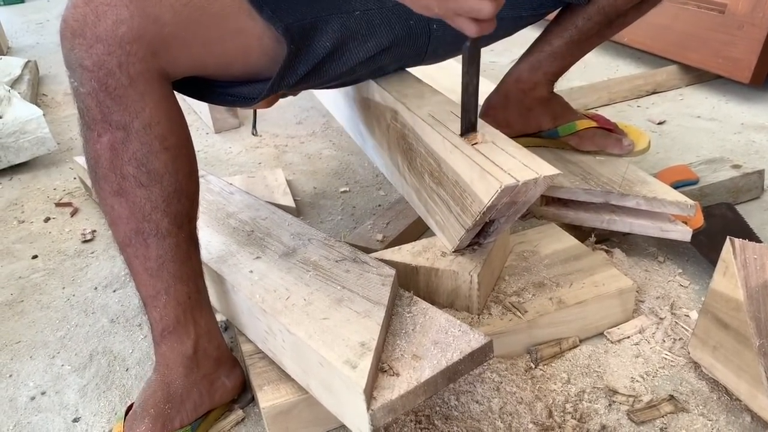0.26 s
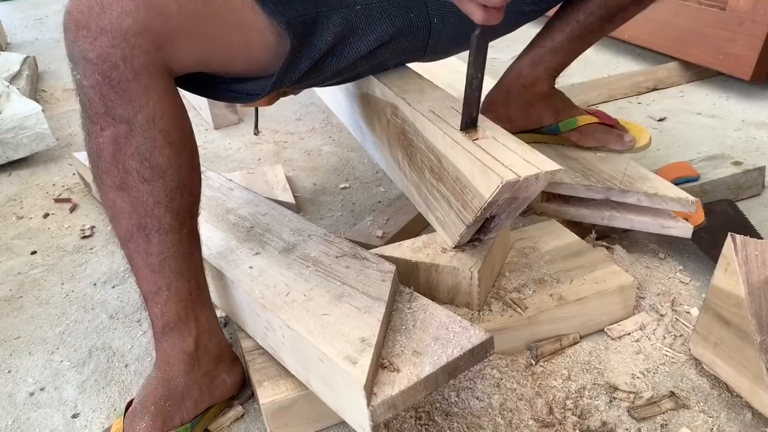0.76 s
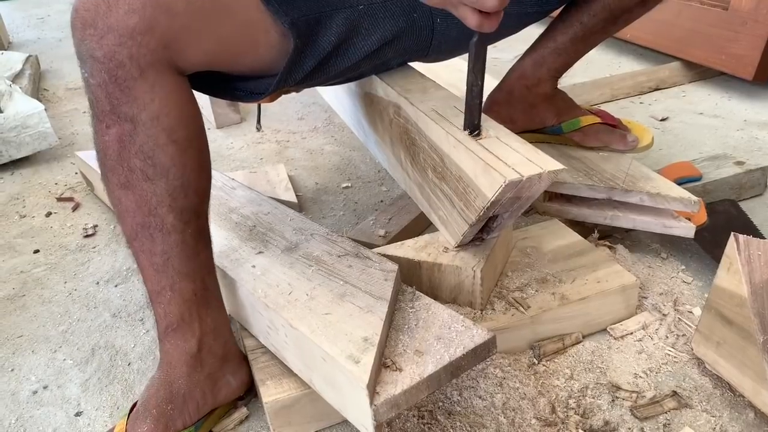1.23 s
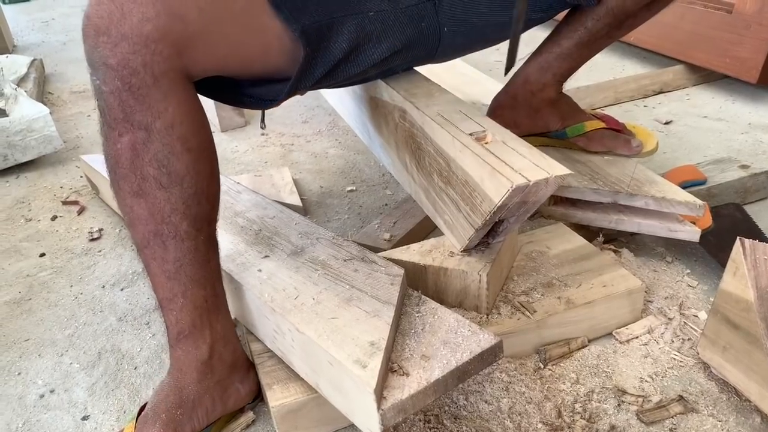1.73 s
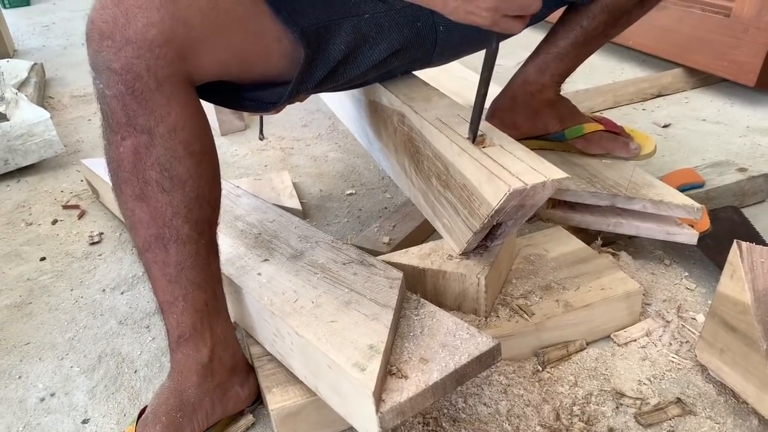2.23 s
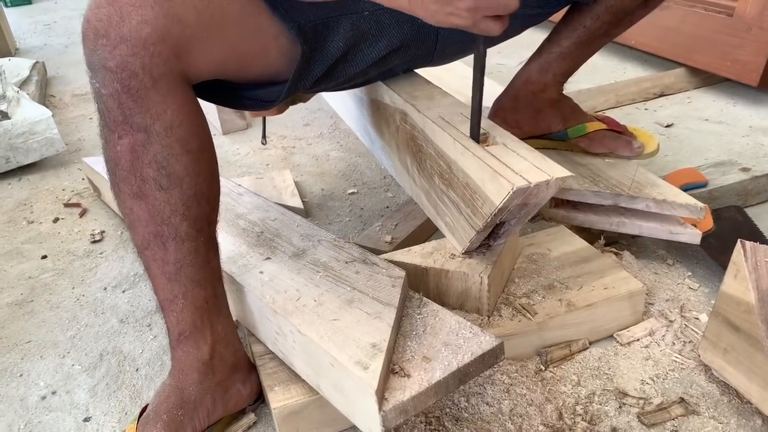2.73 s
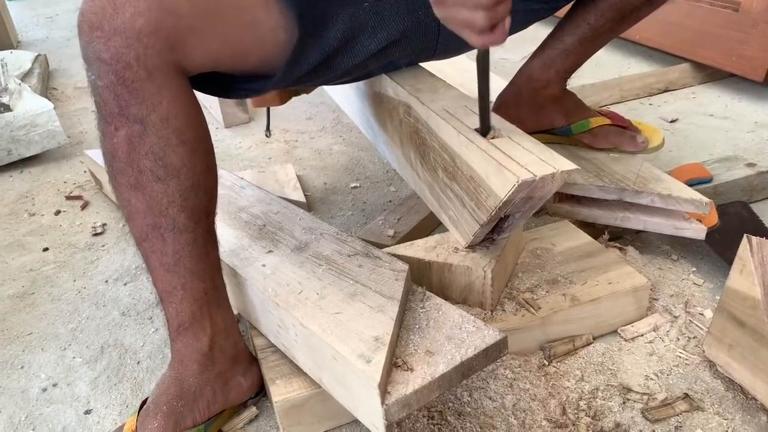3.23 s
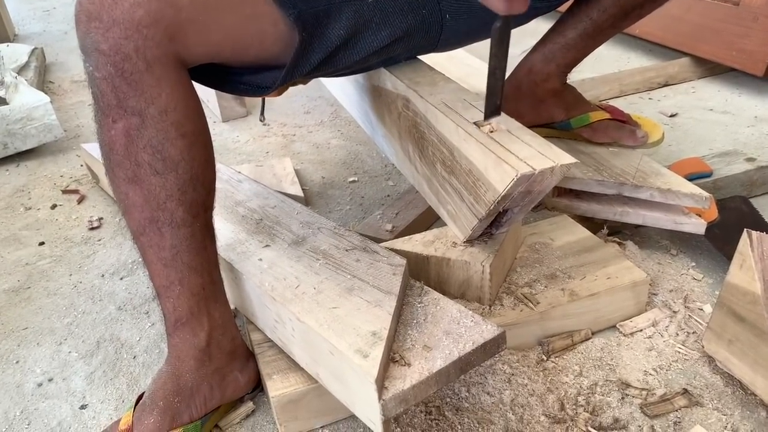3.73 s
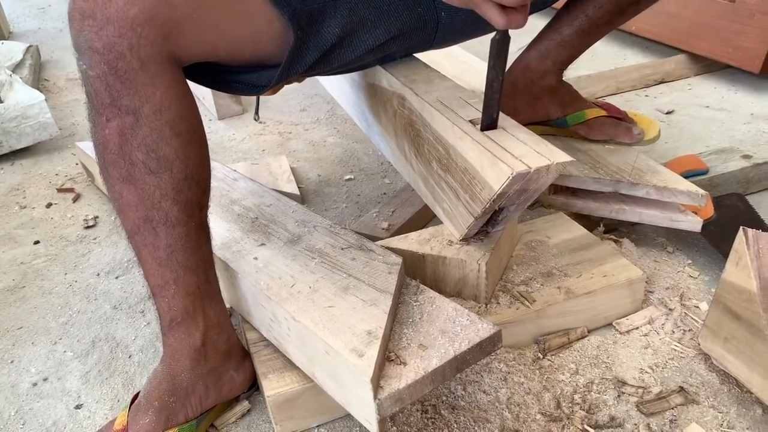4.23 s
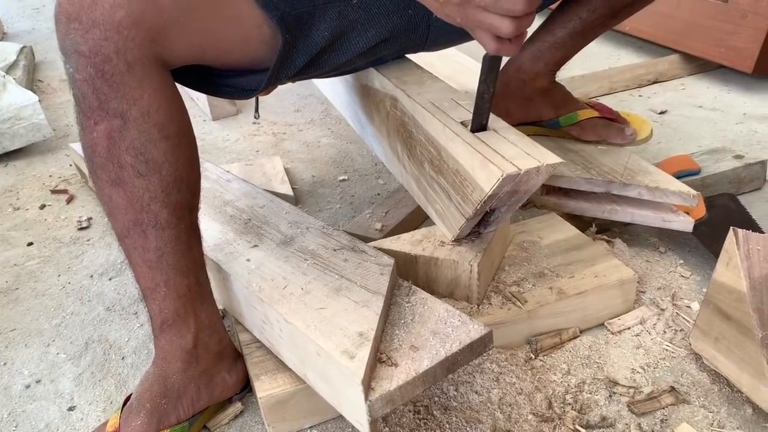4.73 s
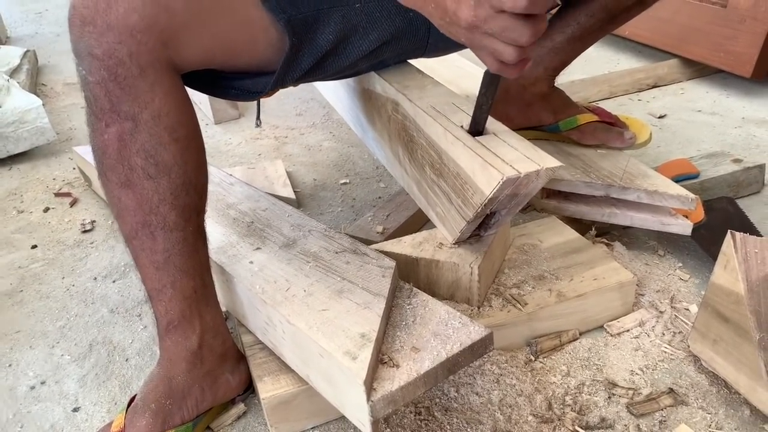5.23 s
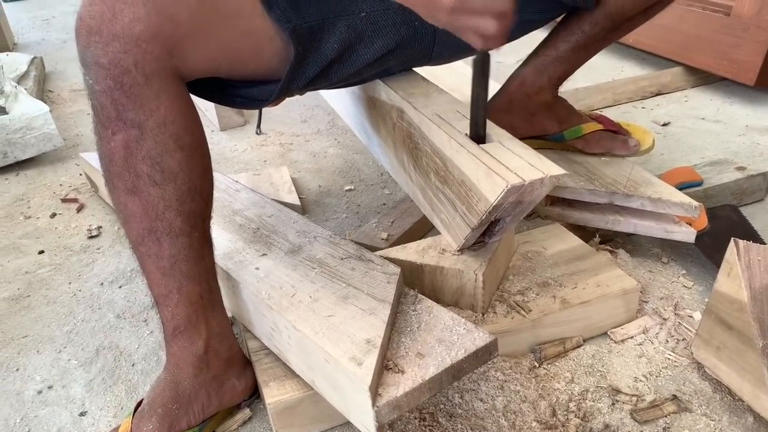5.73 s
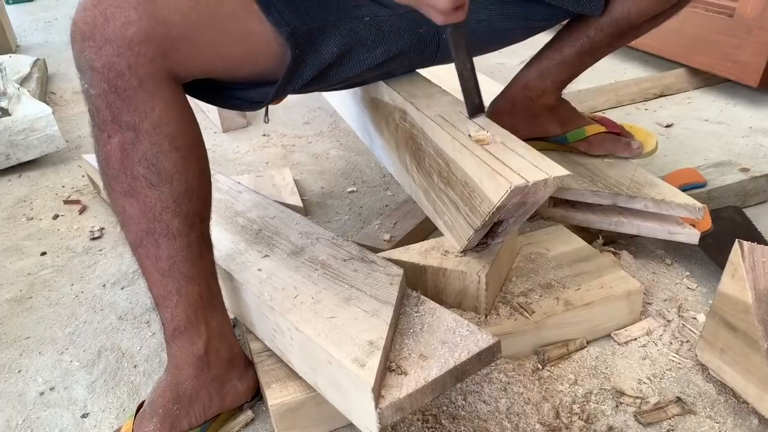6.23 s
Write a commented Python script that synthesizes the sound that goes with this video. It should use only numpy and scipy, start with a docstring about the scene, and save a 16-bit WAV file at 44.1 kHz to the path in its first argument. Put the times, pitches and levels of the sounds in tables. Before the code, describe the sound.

Close to the microphone, a hammer strikes a chisel set in a timber beam: two strong blows, a pause, a weak tap and a firmer blow, another pause, then four quick hard ones. Each cracks with brief steel ring, hollow wooden knock and about a second of bare-room echo. Small ticks and wood bumps fall between. Farther off, gritty scrapes like a stiff broom on concrete come and go over low outdoor rumble.

```python
"""Chisel and hammer in a bare concrete room

A carpenter close to the microphone drives a chisel into a timber beam with a hammer, in short runs.
Each blow is a crack of noise with ringing steel, then the decaying modes and hops of the beam on its
blocks, then the room's dense echoes. Farther off come gritty strokes like a stiff broom on concrete:
tufts of rough noise, sand and ticking chips. A low outdoor rumble lies under both."""
import sys
import numpy as np
from scipy import signal
from scipy.fft import rfft, irfft, next_fast_len
from scipy.io import wavfile
from scipy.ndimage import uniform_filter1d

SR = 44100
rng = np.random.default_rng(int(sys.argv[2]) if len(sys.argv) > 2 else 0)


def wav_out(sig):
    """Save sig, one row per channel (or a flat mono array), as 16-bit PCM at SR to the path in sys.argv[1]."""
    wavfile.write(sys.argv[1], SR, np.round(np.clip(np.atleast_2d(sig).T, -1, 1) * 32767).astype(np.int16))


N = 285327
TIME = np.arange(N) / SR
RING_TIME = TIME[:int(1.3 * SR)]   # the span of one struck sound or echo [s]

# modes of the beam on its blocks: (frequency [Hz], relative level [dB], t60 [s])
BEAM_MODES = [(64.5, -25.5, 0.39), (163.9, -14, 0.19), (183.1, -18.5, 0.22), (281.4, -20.5, 0.29),
              (439.4, -10.5, 0.15), (451.6, -29, 0.57), (534, -24.5, 0.5), (573, -15.5, 0.094),
              (635.1, -10.5, 0.24), (720, -19.5, 0.17), (905, -15.5, 0.083), (1064, -19.5, 0.084),
              (1460, -31.5, 0.29), (1720, -33, 0.11), (2140, -29.5, 0.14), (2690, -32, 0.11)]
# how long the room rings: (frequency [Hz], t60 [s])
ROOM_T60 = [(60, 0.8), (250, 1.195), (600, 0.99), (2000, 0.84), (5000, 0.84), (9000, 0.52), (15000, 0.36)]
# likeness of the two channels: (frequency [Hz], correlation [1 = alike, nominal])
LIKENESS = [(60, 1), (130, 0.92), (290, 0.9), (640, 0.33), (1400, 0.053), (3000, -0.094), (6500, 0.12),
            (7300, -0.42), (8200, 0.42), (10200, 0.085), (10700, -1), (11900, -1.4), (12500, 0.78),
            (15000, 0.3)]


def from_db(db):
    """Decibels to gain."""
    return 10 ** (np.asarray(db) / 20)


def at_hz(points, hz):
    """Read a table on a log-frequency axis."""
    known_hz, values = np.transpose(points)
    return np.interp(np.log(np.maximum(hz, 1)), np.log(known_hz), values)


def add(track, s, sound):
    """Mix a sound into a track at time s."""
    start = max(round(s * SR), 0)
    part = sound[:, :N - start]
    track[:, start:start + part.shape[1]] += part


def noise(spectrum, size, direct=0, colour=((1, 0),)):
    """Stereo noise of rms 1, then coloured by (Hz, dB) points; the direct share is the same at both ears."""
    padded = next_fast_len(size)
    hz = np.arange(padded // 2 + 1) * SR / padded
    alike = np.clip(direct + (1 - direct) * at_hz(LIKENESS, hz), -1, 1)
    shape = from_db(at_hz(spectrum, hz))
    white = rfft(rng.standard_normal((2, padded)))
    mid, side = white * from_db(at_hz(colour, hz)) * shape / np.sqrt(np.mean(shape ** 2))
    shared = np.sqrt((1 + alike) / 2) * mid
    opposed = np.sqrt((1 - alike) / 2) * side * [[1], [-1]]
    return irfft(shared + opposed, padded)[:, :size]


def coloured(sound, colour):
    """Shape a sound by (Hz, dB) points."""
    size = sound.shape[1]
    hz = np.arange(size // 2 + 1) * SR / size
    return irfft(rfft(sound) * from_db(at_hz(colour, hz)), size)


def bell(sound, hz, width_hz, db):
    """A peak or dip in the frequency response."""
    w, height = 2 * np.pi * hz / SR, from_db(db / 2)
    alpha = np.tan(np.pi * width_hz / SR)
    zeros = [1 + alpha * height, -2 * np.cos(w), 1 - alpha * height]
    poles = [1 + alpha / height, -2 * np.cos(w), 1 - alpha / height]
    return signal.lfilter(zeros, poles, sound)


def catching(depth_db, length, size):
    """Uneven friction: a gain that wanders over about size samples."""
    wander = uniform_filter1d(rng.standard_normal(length), size)
    return from_db(depth_db * wander / np.std(wander))


def dying(t60, rise_s):
    """Envelope of a struck thing: a quick rise, then exponential decay."""
    return (1 - np.exp(-RING_TIME / rise_s)) * from_db(-60 * np.minimum(RING_TIME / t60, 4))


def ring(modes, gains_db, rise_s, scatter_db, detune):
    """Decaying modes start from rest; contacts vary their strength and pitch, and channels their phase."""
    out = np.zeros((2, len(RING_TIME)))
    scatter = rng.standard_normal((len(modes), 3))
    for k, ((hz, db, t60), gain_db, (strength, pitch, ears)) in enumerate(zip(modes, gains_db, scatter)):
        # the less alike the channels are at this pitch, the further out of step
        apart = np.sign(ears) * np.arccos(np.clip(at_hz(LIKENESS, hz), -1, 1)) / 3
        angle = 2 * np.pi * hz * (1 + detune * pitch) * RING_TIME + apart * np.array([[1], [-1]])
        gain = (-1) ** k * from_db(db + gain_db + scatter_db * strength)
        out += gain * dying(t60, rise_s) * np.sin(angle.astype(np.float32))
    return out


def ambience():
    """A steady low outdoor rumble: shaped noise."""
    # (frequency [Hz], relative density [dB per Hz])
    rumble = [(20, -30), (35, 0.5), (55, 5.5), (100, -4), (200, -6), (500, -11.5), (1000, -19),
              (2500, -26.5), (6000, -29.5), (9000, -24), (15000, -44.5)]
    return from_db(-46.5) * noise(rumble, N)


def sagging(sound, middle_s):
    """The bristles bend further as a stroke goes on, so their pitch falls, passing its own at middle_s."""
    octaves_per_s = 1.2
    t = TIME[:sound.shape[1]]
    read_s = np.cumsum(2 ** (octaves_per_s * (middle_s - t))) / SR
    return np.array([np.interp(read_s, t, channel) for channel in sound])


def chips(size, count=12):
    """Loose chips flicked over the floor tick at random, most faintly, in a dozen damped resonances."""
    chips_per_s, t60_s = 88, 0.022
    out = np.zeros((2, size))
    for hz in np.geomspace(900, 5000, count) * rng.uniform(.93, 1.07, count):
        hit = rng.random(size) < chips_per_s / count / SR
        clicks = hit * from_db(3.5 * np.minimum(rng.exponential(1, size), 3) - 10)
        r, w = from_db(-60 / (t60_s * SR)), 2 * np.pi * hz / SR
        # the tiny offset keeps the filter out of slow denormal numbers
        ticks = signal.lfilter([0, np.sin(w)], [1, -2 * r * np.cos(w), r * r], clicks + 1e-18)
        out += ticks * rng.uniform(.4, 1, (2, 1))   # left and right gains
    return out


def broom(edge_s=0.02, tuft_spread=0.49, tuft_width=0.11, tuft_db=7, count=4):
    """Bristle tufts catch on concrete, each at its pitch; the head resonates and squeaks, dragging grit."""
    # broom strokes: (start [s], length [s], rise [s], effort [relative dB], sand [relative dB],
    # body [Hz], body peak [dB], squeak [Hz], squeak peak [dB])
    strokes = [(0.0, 0.026, 0.0013, -26.5, -43, 1370, 10.5, 1470, 0),
               (0.037, 0.15, .07, -18.5, -29, 1720, 2.5, 3990, 8),
               (0.563, 0.061, 0.016, -24, -33.5, 1350, 7.5, 876, 15.5),
               (0.6, 0.3, 0.047, -17.5, -26, 1480, 7, 1980, 2.5),
               (0.921, 0.2, 0.039, -18.5, -31, 1910, 6, 2070, -2),
               (1.72, 0.14, 0.059, -30, -35.5, 875, 12.5, 1370, 8),
               (2.103, 0.15, 0.056, -21.5, -30, 1260, 4, 1420, 2),
               (2.635, 0.17, 0.058, -27.5, -33, 870, 12, 1050, 0),
               (3.686, 0.12, 0.058, -31, -38, 920, 2.5, 1009, 13.5),
               (4.003, 0.24, 0.045, -32, -32.5, 8000, -2, 4500, 7),
               (4.793, 0.2, 0.02, -23.5, -32, 2300, 7, 4300, 3.5),
               (5.231, 0.1, 0.031, -23, -33.5, 5150, 5, 2120, 11),
               (5.617, 0.26, 0.034, -22.5, -33.5, 6200, -1.5, 1400, 4)]
    # noise of the bristles: (frequency [Hz], relative density [dB per Hz])
    bristle_spectrum = [(100, 1), (300, -5.5), (600, 7), (950, 4.5), (2000, 5.5), (3000, 2.5), (4200, 4.5),
                        (5300, -1.5), (6500, -0.5), (15000, -38)]
    # noise of the sand: (frequency [Hz], relative density [dB per Hz])
    grit_spectrum = [(500, -85), (2000, -3), (4500, 1.5), (9000, 8.5), (14600, 5), (15600, -31),
                     (17000, -52)]
    body_width, squeak_width = 1, 0.087   # shares of each resonance's pitch
    chip_db = -12   # against the stroke's effort
    out, t = np.zeros((2, N)), TIME[:SR // 2]
    for start, length, rise_s, effort_db, sand_db, body_hz, body_db, squeak_hz, squeak_db in strokes:
        pressure = np.clip(np.minimum(t / rise_s, (length + edge_s - t) / edge_s), 0, 1)
        tufts_hz = 1700 * np.exp(tuft_spread * np.clip(rng.standard_normal(count), -2, 2))
        bristles = 0
        for hz in tufts_hz:
            tuft = bell(noise(bristle_spectrum, len(t)), hz, hz * tuft_width, tuft_db)
            bristles = bristles + tuft * catching(4.22, len(t), size=700)
        bristles = bell(bristles, body_hz, body_hz * body_width, body_db)
        bristles = bell(bristles, squeak_hz, squeak_hz * squeak_width, squeak_db)
        bristles = sagging(bristles, length / 2)
        sand = from_db(sand_db) * noise(grit_spectrum, len(t)) * catching(2.2, len(t), size=60)
        scrape = from_db(effort_db - 13.5) * bristles * catching(2.93, len(t), size=110)
        flicked = from_db(effort_db + chip_db) * chips(len(t))
        add(out, start, pressure * (scrape + sand + flicked))
    return out


def echo(spectrum, build_s):
    """Dense echoes off bare walls: they build up, then die away octave by octave."""
    size = len(RING_TIME)
    octave = np.log2(np.clip(np.arange(size // 2 + 1) * SR / size, 62.5, 16000) / 62.5)
    diffuse, out = rfft(noise(spectrum, size)), 0
    for k in range(9):
        t60 = at_hz(ROOM_T60, 62.5 * 2 ** k)
        band = np.maximum(1 - abs(octave - k), 0)   # neighbouring bands overlap and sum to 1
        out = out + dying(t60, build_s) * irfft(diffuse * band, size)
    return out


def room(sound, echo_db, build_s):
    """A sound's left channel heard through the echoes of the room."""
    response = echo([(20, 0), (20000, 0)], build_s)
    response = response / np.linalg.norm(response[0])
    return from_db(echo_db) * signal.fftconvolve(sound[:1], response, axes=1)[:, :N]


def crack(contact_s, t60, rise_s):
    """The hammer stays on the chisel for a few ms while the edge bursts through the fibres in jerks."""
    # (frequency [Hz], relative density [dB per Hz])
    crack_spectrum = [(200, -13), (600, -1), (1200, 10.5), (2400, 10), (3500, 5.5), (6000, 3),
                      (10000, -3.5), (14000, -5.5), (15600, -14), (17000, -63)]
    held = from_db(-60 * np.clip((RING_TIME - contact_s) / t60, 0, 4))
    envelope = (1 - np.exp(-RING_TIME / rise_s)) * held
    burst = noise(crack_spectrum, len(RING_TIME), direct=0.5)
    return envelope * burst * catching(2.5, len(RING_TIME), size=20)


def knock(drive, t60, rise_s):
    """The crowd of quickly damped modes of the timber and the boards under it."""
    # (frequency [Hz], relative density [dB per Hz])
    knock_spectrum = [(40, -47), (70, -14), (170, 8.5), (220, 2), (285, 5), (380, -2), (450, 3.5),
                      (530, 6.5), (630, 3), (800, 3), (1100, 0), (1400, -9), (2400, -12.5), (3200, -17.5),
                      (15000, -37)]
    crowd = noise(knock_spectrum, len(RING_TIME), direct=0.48, colour=drive)
    return from_db(-9.5) * dying(t60, rise_s) * crowd


def touches():
    """Light contacts tick and knock; they ring the beam's middle modes but hardly bend it."""
    # the chisel is set down or rocked in the cut: (time [s], tick [relative dB], wood [relative dB])
    contacts = [(0.569, -42, -52), (0.623, -25.5, -42), (1.429, -36, -25), (2.644, -40, -38),
                (3.301, -49, -17.5), (4.074, -36, -14), (4.785, -26.5, -10.5), (5.947, -42, -15.5),
                (6.417, -37, -28)]
    seat_s = 0.0091   # the edge ticks first and seats in the wood this much later
    out = np.zeros((2, N))
    for s, tick_db, wood_db in contacts:
        drive = [(250, wood_db - 16.0), (480, wood_db), (640, wood_db - 6.5), (1000, wood_db - 6)]
        tick = from_db(tick_db) * crack(contact_s=.0015, t60=.03, rise_s=.001)
        tick = bell(tick, hz=1800, width_hz=150, db=10)   # a soft contact favours the shank's low note
        gains_db = at_hz(drive, np.array(BEAM_MODES)[:, 0]) - 9
        beam = ring(BEAM_MODES, gains_db, rise_s=.002, scatter_db=1.0, detune=.005)
        add(out, s, tick)
        add(out, s + seat_s, beam + knock(drive, t60=0.084, rise_s=0.0033))
    return out


def blow_drive(force_db, extra_boom_db, extra_ring_db, extra_knock_db):
    """How hard a blow drives the timber, as (Hz, dB): sway, thud, boom, ring, knock and splintering."""
    # each "follows" is the dB gained per dB of force
    sway_follows, body_follows, knock_follows, splinter_follows = 0.76, 0.93, 0.79, 1
    sway_db = 5 + sway_follows * force_db   # sway and thud: the two slowest bendings of the beam
    thud_db = 0 + sway_follows * force_db
    boom_db, ring_db = force_db + extra_boom_db, force_db + extra_ring_db
    body_db = body_follows * force_db   # the beam's middle notes
    knock_db = 0.5 + knock_follows * force_db + extra_knock_db
    splinter_loss = 0.98   # a blow that booms cuts less: dB lost per dB of extra boom
    splinter_db = 1 + splinter_follows * force_db - splinter_loss * extra_boom_db
    return [(70, sway_db), (175, thud_db), (230, boom_db), (360, boom_db), (440, body_db), (520, body_db),
            (600, ring_db), (850, ring_db), (1100, knock_db), (2400, knock_db), (4000, splinter_db)]


def from_the_right(sound):
    """The work lies to the right of the microphone, so its sound reaches the left port later."""
    port_lag_s = 0.00019
    return np.array([np.roll(sound[0], round(port_lag_s * SR)), sound[1]])


def rattle(drive, count=4):
    """The beam hops on its blocks and lands a few times, unevenly and ever more lightly on the whole."""
    gap_s, first_db, loss_db = 0.013, -7.5, 6.5   # usual gap, first landing, loss per hop
    out = np.zeros((2, N))
    for k, (shift, strength) in enumerate(rng.uniform(-1.1, 1, (count, 2))):
        landing = knock(drive, t60=0.064, rise_s=0.001)
        landing_db = first_db - loss_db * k + 2 * strength
        add(out, gap_s * (k + 1 + shift / 4), from_db(landing_db) * landing)
    return out


def along_the_beam(sound):
    """Bending waves spread out in time: the knock arrives first and the boom last."""
    delay_s, bend_hz = 0.011025, 100.05   # waves of this pitch take so long; higher ones run faster
    padded = next_fast_len(N + SR // 2)
    hz = np.arange(padded // 2 + 1) * SR / padded
    turns = 2 * delay_s * np.sqrt(bend_hz * hz)
    return irfft(rfft(sound, padded) * np.exp(-2j * np.pi * turns), padded)[:, :N]


def blows():
    """Each blow cracks, sets the whole beam going (low modes boom, higher ones ring) and fills the room."""
    # hammer blows; all but the force depend on where the edge bites and how the hammer lands:
    # (time [s], force [relative dB], extra boom [dB], extra ring [dB], extra hard knock [dB],
    # extra crack [dB], contact [s], clack [nominal Hz], ping [nominal Hz], ping [relative dB])
    hammering = [(0.918, -1.5, -4, 3.5, 5, 0, .005, 2490, 4420, 2),
                 (1.263, 3.5, 3.5, -2, 1.5, 1.5, 0.001, 2440, 4110, -9),
                 (2.735, -16, 0.5, 3, 4.5, -4.5, 0.0045, 2640, 4150, -9),
                 (3.0155, -4, -2.5, -5, -0.5, -0.5, 0.0017, 2610, 3920, 5),
                 (4.4105, -2, -3, -0.5, 3.5, 2.5, 0.0027, 2330, 5920, -3),
                 (4.807, 0, -4, -3.5, 2, 2.5, 0.0034, 2200, 9280, 0.5),
                 (5.238, 3, -5, 2, 1.5, -2, 0.0038, 2200, 8100, -1.5),
                 (5.5947, 2.5, -1.5, 0, 0.5, -1, 0.0023, 1770, 6050, 7)]
    # steel of the chisel, damped by hand and wood: (nominal pitch [Hz], relative level [dB], t60 [s])
    chisel = [(1140, -9, 0.0037), (4150, -2.5, 0.011), (8300, -16.5, 0.0063), (13000, -46, 0.0034)]
    # what the walls send back of a blow: (frequency [Hz], relative density [dB per Hz])
    wall_spectrum = [(35, -16), (60, 2.5), (100, 2), (122, -2), (150, 1), (212, -5), (260, -7.5),
                     (365, -3.5), (450, 0), (560, -1), (700, -0.5), (1000, -8), (1500, -13), (2200, -12.5),
                     (2600, -14), (3100, -22.5), (4400, -22), (15000, -39.5)]
    # standing waves of the room that the beam sets going: (nominal pitch [Hz], relative level [dB])
    room_modes = [(65, -44), (83, -44), (98.3, -27.5), (143, -38.5), (157, -29.5), (243, -46.5), (287, -40),
                  (323.6, -31.5), (410, -31), (425, -31), (443, -30.5), (500, -54), (608, -34),
                  (627, -21.5), (641, -28.5), (716, -29.5), (843, -27.5), (897, -39), (1073, -42),
                  (1345, -46), (2100, -50)]
    crack_base_db, crack_follows = -9.5, 0.43   # at force 0 dB; dB gained per dB of force
    clack_db, clack_t60_s = 0.5, 0.022   # the shank's main note
    ping_t60_s = 0.016   # the high note that the hammer face picks out dies almost with the crack
    out, wood = np.zeros((2, 2, N))
    # the work stays in place, so about half of each echo is the same from blow to blow
    usual_echo = echo(wall_spectrum, build_s=0.057)
    standing = [(hz, db, at_hz(ROOM_T60, hz)) for hz, db in room_modes]
    for (s, force_db, extra_boom_db, extra_ring_db, extra_knock_db,
         extra_crack_db, contact_s, clack_hz, ping_hz, ping_db) in hammering:
        drive = blow_drive(force_db, extra_boom_db, extra_ring_db, extra_knock_db)
        crack_db = crack_base_db + crack_follows * force_db + extra_crack_db
        beam_db = at_hz(drive, np.array(BEAM_MODES)[:, 0])
        beam = ring(BEAM_MODES, beam_db, rise_s=0.005, scatter_db=1.2, detune=0.004)
        notes = list(chisel) + [(clack_hz, clack_db, clack_t60_s), (ping_hz, ping_db, ping_t60_s)]
        steel = ring(notes, np.full(len(notes), crack_db), rise_s=.0008, scatter_db=1.0, detune=.006)
        burst = from_db(crack_db) * from_the_right(crack(contact_s, t60=0.017, rise_s=0.0008))
        diffuse = coloured(usual_echo + echo(wall_spectrum, build_s=0.045), drive)
        diffuse = diffuse * catching(1.0, len(RING_TIME), size=350)
        walls = bell(diffuse, hz=602.5, width_hz=28, db=7.0)   # the beam's main note lingers
        hum_db = at_hz(drive, np.array(standing)[:, 0])
        hum = ring(standing, hum_db, rise_s=0.026, scatter_db=0.5, detune=0.0021)
        add(out, s, burst + steel + from_db(-18.5) * walls)
        add(wood, s, beam - hum + knock(drive, t60=0.097, rise_s=0.0035))
        add(wood, s, rattle(drive))
    return out + along_the_beam(wood)


def scene():
    """The chisel is close; the broom is farther off, heard mostly by its echo, over a low rumble."""
    # a light contact sends mostly its tick to the walls: (frequency [Hz], gain [dB])
    touch_colour = [(450, -8), (1500, 2)]
    ticks, sweeping = touches(), broom()
    near = blows() + ticks + room(coloured(ticks, touch_colour), echo_db=-3.0, build_s=0.0022)
    far = from_db(-12.0) * sweeping + room(sweeping, echo_db=-10.0, build_s=0.0077)
    return near + far + ambience()


def record(dry):
    """Two small microphone ports colour the sound differently; bass and top are cut and peaks rounded."""
    # colour of the microphone: (centre [Hz], width [Hz], gain [dB])
    microphone = [(3170, 1020, -1.5), (7460, 540, -3), (8180, 82, 7)]
    rumble_cut_hz, top_cut_hz = 36, 15600
    for hz, width_hz, db in microphone:
        dry = bell(dry, hz, width_hz, db)
    left = bell(bell(dry[0], hz=2400, width_hz=1700, db=2.5), hz=82, width_hz=114, db=-2.5)
    right = bell(dry[1], hz=8490, width_hz=1480, db=6.0)
    bass_cut = signal.butter(2, rumble_cut_hz, "high", fs=SR, output="sos")
    rounded = np.tanh(signal.sosfilt(bass_cut, [left, right]))
    top_cut = signal.ellip(10, .2, 100, top_cut_hz, fs=SR, output="sos")
    return signal.sosfilt(top_cut, rounded)


dry = scene()
out = record(dry)
wav_out(out)
```